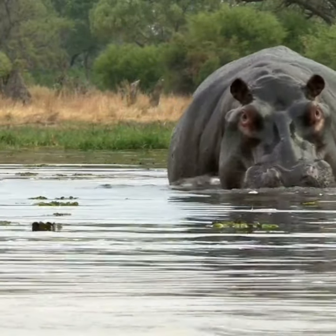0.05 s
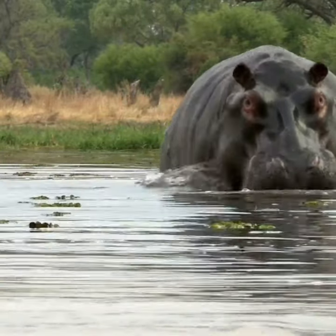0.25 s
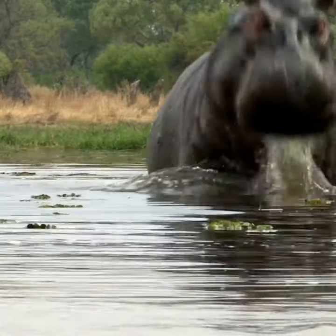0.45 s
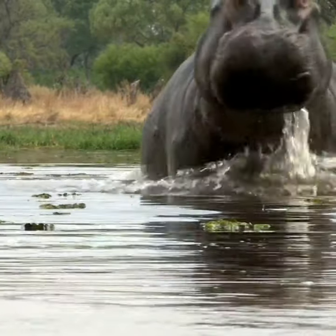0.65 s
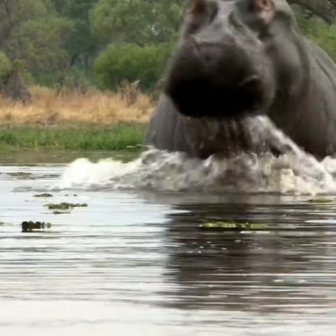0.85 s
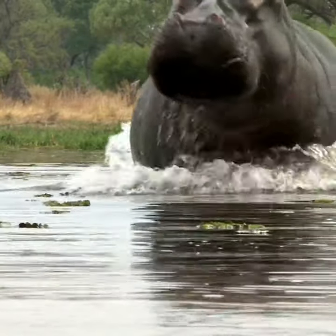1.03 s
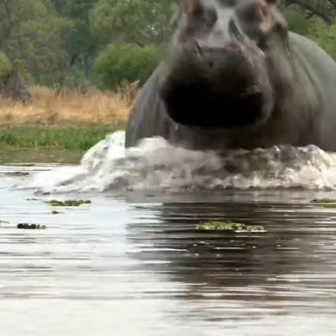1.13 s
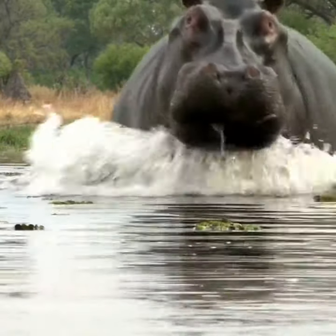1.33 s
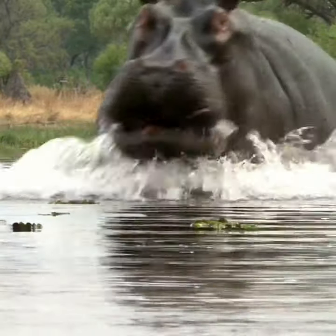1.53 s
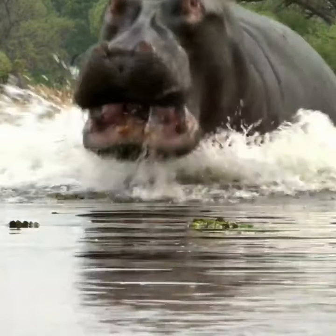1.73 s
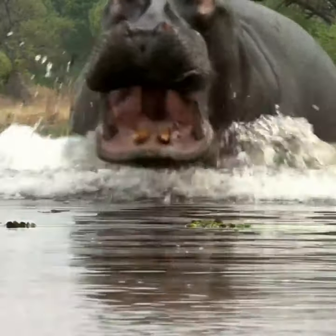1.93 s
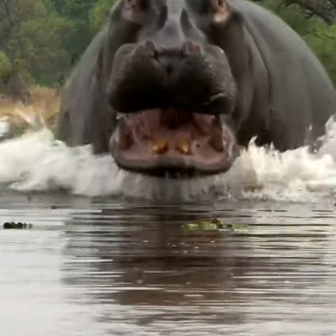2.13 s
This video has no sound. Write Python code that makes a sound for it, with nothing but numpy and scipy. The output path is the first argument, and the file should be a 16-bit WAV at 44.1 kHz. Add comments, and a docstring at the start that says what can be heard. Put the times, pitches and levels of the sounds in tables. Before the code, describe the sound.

A hippo gives one short, pulsed grunt with a light slosh of water. After a quiet pause it lets out a loud, hoarse roar that ends in a rattle, while water churns and sprays in the open air.

```python
"""In shallow water, a hippo gives one short pulsed grunt, then roars as it charges.
Its vocal folds snap shut over and over, and each snap makes the throat ring. The roar starts hoarse,
locks into a clear tone, is shaken by a second flutter, breaks up, and ends in a slowing rattle.
Water churns and sprays around its chest; the far bank returns a dull tail over a quiet outdoor hush."""
import sys
import numpy as np
from scipy import signal
from scipy.fft import rfft, irfft
from scipy.io import wavfile
from scipy.ndimage import uniform_filter1d

SR = 44100
rng = np.random.default_rng(int(sys.argv[2]) if len(sys.argv) > 2 else 0)


def file_out(sig):
    """Save sig as 16-bit WAV at sys.argv[1]."""
    # one column per channel
    cols = np.atleast_2d(sig).T
    # limit, then scale
    lim = np.clip(cols, -1, 1)
    pcm = np.round(lim * 32767).astype(np.int16)
    wavfile.write(sys.argv[1], SR, pcm)


N = 96182
T = np.arange(N) / SR

# where the throat rings in the roar: f/Hz, width/Hz, gain when hoarse/dB, gain in slow pulses/dB
ROAR_THROAT = [(122, 64, -17, 6), (285.7, 58, -4.5, 10.5), (405, 250, -1.5, -1), (583, 120, -2.5, 0.5),
               (869, 98, 0.5, 8), (1076, 193, 2, 3), (1727, 298, -7, 7), (2380, 102, -8, 3.5),
               (2808, 60, -7, -4.5)]
# each call starts muffled, then its treble opens up: t/s, gain/dB
OPENING = [(0.235, -9), (0.29, -1), (0.335, 0), (0.357, 6), (1.38, -9), (1.42, 0)]


def roar():
    """A clear tone, a hoarse voice and rattles; a second vibration in the throat shakes the first two."""
    # strength of that flutter: t/s, depth/0-1
    flutter_curve = [(1.47, 0.26), (1.505, 0.04), (1.56, 0.02), (1.595, 0.25), (1.75, 0.32)]
    flutter_hz, wander, top_hz = 112, .055, 2750
    depth, = in_time(flutter_curve)
    flutter = phase_of(flutter_hz * (1 + wander * drift(27.66)))
    tone = clear_tone(flutter, depth)
    throb = 1 + 1.8 * depth * np.cos(flutter)
    return tone + low_pass(throb * hoarse_roar() + rattles(), top_hz, order=7)


def clear_tone(flutter, depth):
    """The folds vibrate evenly; the flutter makes the overtones throb and adds side tones between them."""
    # course of the tone: t/s, f/Hz, level of the lowest tone/dB, level of the overtones/dB
    tone_curve = [(1.41, 229.3, -59, -42), (1.47, 236.7, -23, -31.5), (1.505, 246.3, -28.5, -21),
                  (1.545, 249.2, -19.5, -23), (1.6, 251.7, -18, -25.5), (1.655, 252.6, -17, -22.5),
                  (1.705, 247.4, -18, -22.5), (1.75, 247.3, -17, -27), (1.83, 244.5, -26, -37),
                  (1.94, 242.7, -28, -60)]
    # overtones at 2, 3, 4... times the pitch: gain/dB
    overtone_gains = [1.5, 2, 6.5, 2.5, -5, -9, -9, -13, -25.5, -41, -30, -37, -46, -44, -32, -40, -27]
    wander, swing_rad, smear_rad = .0023, .85, .255
    hz, base_db, overtones_db = in_time(tone_curve)
    phase = phase_of(hz * (1 + wander * drift(48)))
    shaken = phase - depth * swing_rad * np.sin(flutter)
    overtones = np.zeros(N)
    for k, db in enumerate(overtone_gains, 2):
        dulling_db = 9 * depth * (k > 3)
        lag = smear_rad * k * k  # the throat delays higher overtones more
        overtones += from_db(db - dulling_db) * np.cos(k * shaken - lag)
    overtones *= 1 + 1.3 * depth * np.cos(flutter)
    base = from_db(base_db) * np.sqrt(2) * np.cos(phase)
    return during(tone_curve) * (base + from_db(overtones_db) * overtones)


def hoarse_roar():
    """The folds snap at uneven times and with uneven force, ringing the throat and mouth."""
    # loudness of the hoarse voice: t/s, level/dB
    hoarse_curve = [(1.41, -33), (1.43, -26.5), (1.475, -22.5), (1.51, -30), (1.555, -42), (1.6, -25),
                    (1.69, -24.5), (1.75, -19), (1.92, -15.5), (1.95, -20), (1.98, -32)]
    pitch_hz, jitter, flicker_db = 241.05, .2, 2.5
    rate = pitch_hz * np.exp(jitter * drift(150))
    source = fold_pulses(rate, rasp=.45, shimmer_db=7.5)
    voice = throat(source, [row[:3] for row in ROAR_THROAT]) + mouth(source)
    voice = signal.sosfilt(signal.butter(2, 130, "high", fs=SR, output="sos"), voice)
    voice /= np.sqrt(uniform_filter1d(voice ** 2, size=500) + 1e-9)  # even out the loudness
    flicker = from_db(flicker_db * np.tanh(drift(57.5)))
    return voice * gain_of(hoarse_curve) * flicker * during(hoarse_curve)


def rattles():
    """The roar begins and ends in slow pulses of the folds."""
    # quickening pulses that start the roar: t/s, pulse rate/Hz, level/dB
    wind_up = [(1.3755, 118, -41), (1.406, 130, -33.5), (1.412, 120, -33), (1.435, 140, -23.5),
               (1.46, 240, -34)]
    # slowing pulses that end it: t/s, pulse rate/Hz, level/dB
    wind_down = [(1.931, 121, -23), (1.962, 118, -17), (1.98, 111, -22), (2.01, 105, -23),
                 (2.05, 102, -22.5), (2.084, 80, -34)]
    resonances = [(hz, width, db) for hz, width, _, db in ROAR_THROAT]
    return from_db(-1.5) * sum(pulsed_call(curve, resonances, rasp=.4) for curve in (wind_up, wind_down))


def grunt():
    """A short run of slowing pulses, dull at first, then each with a bright, wet snap."""
    # pulses of the grunt: t/s, pulse rate/Hz, level/dB
    grunt_curve = [(0.2228, 82, -28), (0.25, 85, -27), (0.295, 82, -21.5), (0.314, 74, -20),
                   (0.329, 62, -22.5), (0.36, 43, -31)]
    # where the throat rings in the grunt: f/Hz, width/Hz, gain/dB
    grunt_throat = [(87, 25, 14), (245, 59, 17), (517, 280, 13), (743, 53, 15), (1080, 640, -1),
                    (1666, 800, 3.5), (2330, 117, 4)]
    voice_db, snap_db = -3.5, -31.5
    rate, db = in_time(grunt_curve)
    snaps = fold_pulses(rate * during(grunt_curve), rasp=2.5) * from_db(db + snap_db) * gain_of(OPENING)
    wet_snaps = low_pass(resonate(snaps, hz=6350, width_hz=5000), 5700)
    voice = low_pass(pulsed_call(grunt_curve, grunt_throat, rasp=.6), 2950, order=4)
    return from_db(voice_db) * voice + wet_snaps


def pulsed_call(curve, resonances, rasp):
    """Slow, soft-edged pulses thump the low resonances; the upper ones open as the call builds."""
    split_hz, soft_edge_hz = 1000, 1330
    rate, db = in_time(curve)
    source = fold_pulses(rate * during(curve), rasp) * from_db(db)
    power = sum(from_db(gain_db) ** 2 * np.pi * width / SR for _, width, gain_db in resonances)
    lower, upper = mouth(source), np.zeros(N)
    for hz, width, gain_db in resonances:
        ring = from_db(gain_db) * resonate(source, hz, width) / np.sqrt(power)
        if hz < split_hz:
            lower += ring
        else:
            upper += resonate(ring, hz, width)
    lower -= low_pass(lower, 39, order=1)  # take out the deepest rumble
    return low_pass(lower, soft_edge_hz, order=3) + gain_of(OPENING) * upper


def fold_pulses(rate, rasp, shimmer_db=0):
    """The vocal folds snap shut once a cycle, each time with a fading puff of rushing air."""
    puff_s = .005
    cycle_count = np.ceil(np.cumsum(rate) / SR)
    snaps = np.diff(cycle_count, prepend=0) * np.sqrt(SR / np.maximum(rate, 20))
    snaps *= from_db(shimmer_db * np.clip(rng.standard_normal(N), -2, 2))  # uneven force
    decay = np.exp(-1 / (puff_s * SR))
    puffs = signal.lfilter([np.sqrt(1 - decay * decay)], [1, -decay], snaps + 1e-18)
    return snaps + rasp * puffs * rng.standard_normal(N)


def throat(x, resonances):
    """The air in the throat rings at a few pitches; filtering twice makes each peak steep-sided."""
    power = sum(from_db(db) ** 2 * np.pi * width / (2 * SR) for _, width, db in resonances)
    rings = sum(from_db(db) * resonate(resonate(x, hz, width), hz, width) for hz, width, db in resonances)
    return rings / np.sqrt(power)


def mouth(x):
    """The open mouth rings at a gliding pitch, which changes the vowel."""
    # the mouth's resonance: t/s, f/Hz, gain/dB
    glide = [(1.78, 560, -14), (1.86, 470, 2), (1.92, 450, 3), (1.96, 640, -9), (2.01, 580, -2),
             (2.05, 520, 2), (2.08, 430, -4)]
    width_hz = 125
    hz, db = in_time(glide)
    turn = np.exp(1j * phase_of(hz))
    decay = np.exp(-np.pi * width_hz / SR)
    # shift the gliding pitch down to 0 Hz, let it ring there, then shift it back
    ring = signal.lfilter([np.sqrt(2 * (1 - decay * decay))], [1, -decay], x / turn + 1e-18)
    return from_db(db) * np.real(turn * ring)


def throat_pushes():
    """A dull push of the throat opens each call with a brief low rumble."""
    # the pushes: t/s, peak level/dB, width/s
    pushes = [(0.216, -41, 0.016), (1.391, -31, 0.012)]
    rumble_hz, width_hz = 167, 350
    return bumps(pushes) * rms_one(throat(rng.standard_normal(N), [(rumble_hz, width_hz, 0)]))


def spray():
    """Thousands of fine drops land, each with a tiny click."""
    # loudness of the spray: t/s, level/dB
    spray_curve = [(0.354, -76), (0.364, -53), (0.39, -67), (0.47, -93), (1.35, -112), (1.38, -59.5),
                   (1.42, -55.5), (1.465, -35.5), (1.52, -41), (1.79, -39.5), (1.825, -31), (1.89, -39),
                   (1.93, -26.5), (1.965, -40.5), (2.02, -41.5), (2.05, -37.5), (2.1, -43.5)]
    # its tone colour: f/Hz, level/dB
    spray_colour = [(2500, -2), (3500, -6.5), (5000, -15), (6500, -0.5), (8000, -14), (10000, -24),
                    (12500, -34.5), (14000, -46.5)]
    drops = coloured(clicks(per_s=5700, spread_db=4), spray_colour)
    return (T > spray_curve[0][0]) * gain_of(spray_curve) * drops


def churn():
    """Water sloshes and bubbles ring, stirred as the head lifts, then churned by the charge."""
    # loudness of the churning: t/s, level/dB
    churn_curve = [(0.355, -44.5), (0.44, -49.5), (0.56, -69), (1.37, -70), (1.45, -40), (1.7, -34.5),
                   (2.1, -34)]
    # tone colour of the sloshing: f/Hz, level/dB
    slosh_colour = [(80, -10), (450, -3.5), (900, 1), (2400, -3.5), (3600, -17.5), (6000, -26)]
    bubbles_per_s, bubble_db = 600, -5
    pitches = np.geomspace(400, 3200, 20)
    bubbles = np.zeros(N)
    for hz in pitches:
        pops = clicks(bubbles_per_s / len(pitches), spread_db=8.8)
        bubbles += resonate(pops, hz, width_hz=hz / 5) / np.sqrt(hz)
    bubbles = from_db(bubble_db) * low_pass(rms_one(bubbles), 2100, order=4)
    slosh = coloured(clicks(per_s=5000, spread_db=.9), slosh_colour)
    return (T > churn_curve[0][0]) * gain_of(churn_curve) * (slosh + bubbles)


def thumps():
    """Two low thumps in the water during the charge."""
    # the thumps: t/s, peak level/dB, width/s
    hits = [(1.639, -46, 0.016), (1.964, -35, 0.024)]
    # their tone colour: f/Hz, level/dB
    thump_colour = [(15, 2), (60, -29), (120, -22), (400, -71)]
    return bumps(hits) * coloured(rng.standard_normal(N), thump_colour)


def bank_tail(x):
    """The bank and trees scatter the sound back as a dull echo that fades after a short gap."""
    gap_s, fade_s, top_hz, tail_db = .01, .5, 3800, -15
    thinned = x - .11 * low_pass(x, 895, order=1)  # the echo loses a little bass
    tail = low_pass(rng.standard_normal(N), top_hz) * from_db(-60 * T / fade_s) * (T > gap_s)
    tail /= np.sqrt(np.sum(tail ** 2) * SR / (2 * top_hz))
    return from_db(tail_db) * signal.fftconvolve(thinned, tail)[:N]


def hush():
    """The soft, low noise of the open air."""
    # loudness of the hush: t/s, level/dB
    hush_curve = [(0, -54), (0.15, -60), (0.55, -57.5), (0.8, -61.5)]
    # its tone colour: f/Hz, level/dB
    hush_colour = [(40, 0.5), (700, 1), (1400, -5), (2300, -8), (3200, -11.5), (7000, -38), (14000, -24)]
    return gain_of(hush_curve) * coloured(rng.standard_normal(N), hush_colour)


def from_db(db):
    """Turn decibels into a factor to multiply by."""
    return 10 ** (np.asarray(db) / 20)


def rms_one(x):
    """Scale a sound to an average power of 1."""
    return x / np.sqrt(np.mean(x ** 2) + 1e-20)


def in_time(rows):
    """Join a table's rows with straight lines, giving each column a value at every sample."""
    times, *columns = np.transpose(rows)
    return [np.interp(T, times, column) for column in columns]


def gain_of(rows):
    """Turn rows of time and level into a factor for every sample."""
    return from_db(in_time(rows)[0])


def during(rows):
    """True from a table's first time to its last."""
    return (T >= rows[0][0]) & (T <= rows[-1][0])


def bumps(rows):
    """One smooth rise and fall for each row."""
    return sum(from_db(db) * np.exp(-.5 * ((T - s) / width) ** 2) for s, db, width in rows)


def phase_of(hz):
    """The angle a vibration has turned through so far."""
    return 2 * np.pi * np.cumsum(hz) / SR


def drift(hz):
    """A random wander of about size 1, mostly slower than hz."""
    return rms_one(low_pass(rng.standard_normal(2 * N), hz)[N:])


def clicks(per_s, spread_db):
    """Random clicks of uneven size."""
    hits = (rng.random(N) < per_s / SR) * rng.choice([-1, 1], N)
    return hits * from_db(spread_db * np.minimum(rng.exponential(1, N), 4))


def low_pass(x, hz, order=2):
    """Soften everything above hz; a higher order cuts more steeply."""
    return signal.sosfilt(signal.butter(order, hz, fs=SR, output="sos"), x)


def coloured(x, points):
    """Give a noise a tone colour that falls away above the last point; its power comes out as 1."""
    hz, db = np.transpose(points)
    f = np.maximum(np.fft.rfftfreq(N, 1 / SR), 1)
    colour = from_db(np.interp(np.log(f), np.log(hz), db))
    roll_off = np.minimum(1, hz[-1] / f) ** 4
    return rms_one(irfft(rfft(x) * roll_off * colour, N))


def resonate(x, hz, width_hz):
    """Ring at one pitch; the narrower the width, the longer the ring."""
    decay = np.exp(-np.pi * width_hz / SR)
    feedback = [1, -2 * decay * np.cos(2 * np.pi * hz / SR), decay * decay]
    return signal.lfilter(np.array([1, 0, -1]) * (1 - decay * decay) / 2, feedback, x + 1e-18)


def scene():
    """The hippo and the water, their echo and the hush, in one channel."""
    near = roar() + throat_pushes() + grunt() + spray() + churn() + thumps()
    return (near + bank_tail(near) + hush())[None]


def record(dry):
    """Cut away the very highest treble."""
    cutoff_hz = 15600
    return signal.sosfilt(signal.cheby2(12, 70, cutoff_hz, fs=SR, output="sos"), dry)


dry = scene()
out = record(dry)
file_out(out)
```